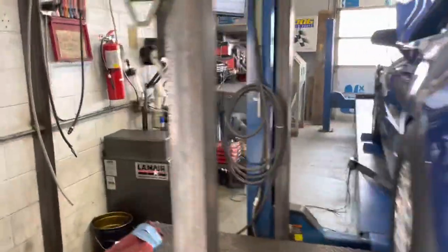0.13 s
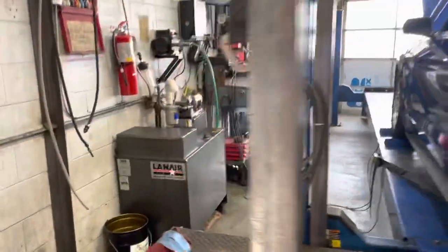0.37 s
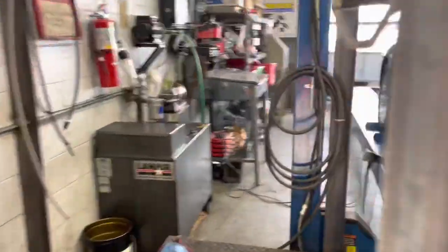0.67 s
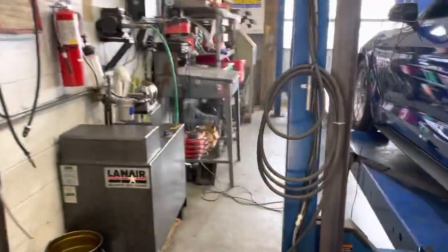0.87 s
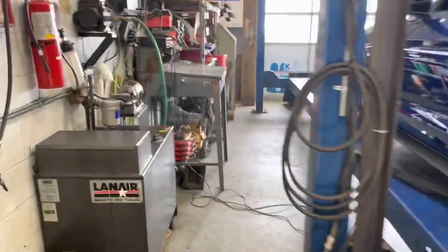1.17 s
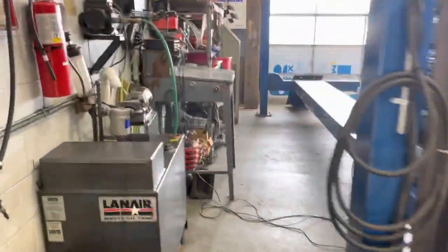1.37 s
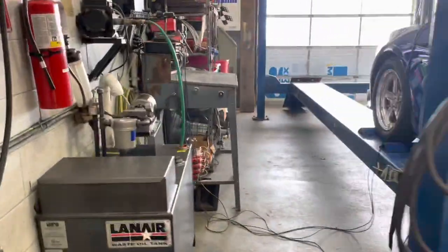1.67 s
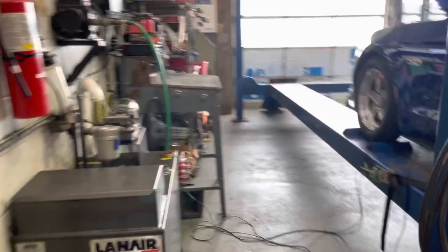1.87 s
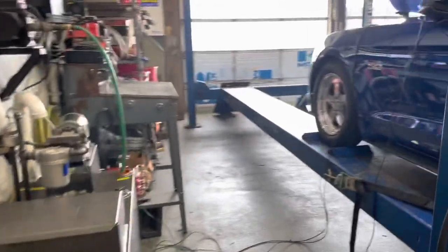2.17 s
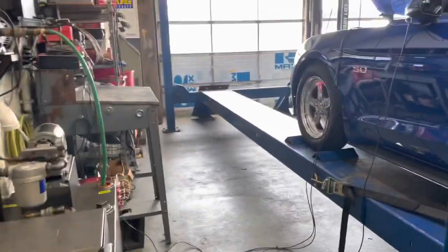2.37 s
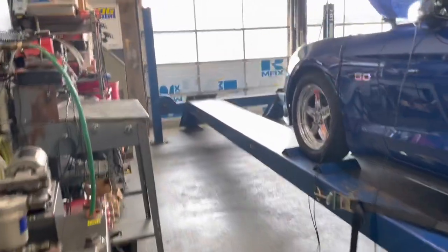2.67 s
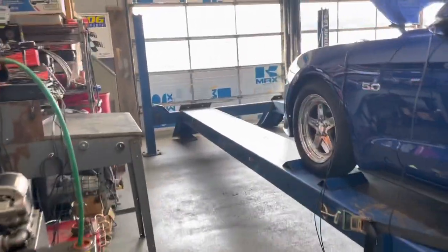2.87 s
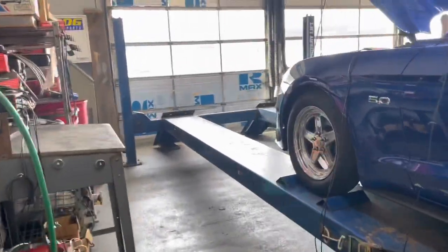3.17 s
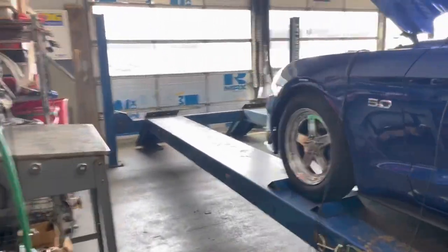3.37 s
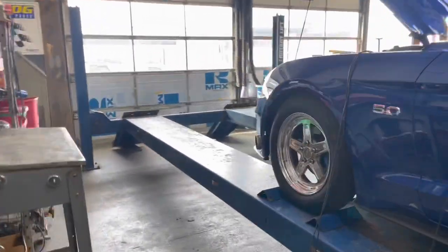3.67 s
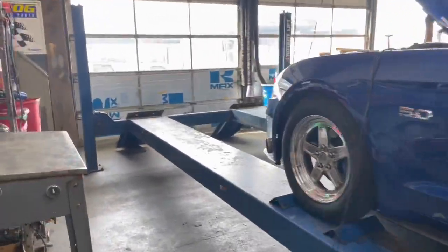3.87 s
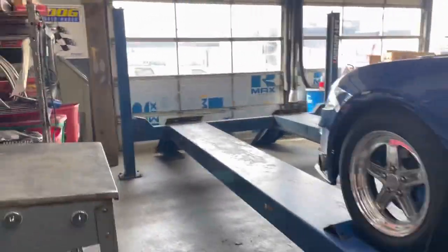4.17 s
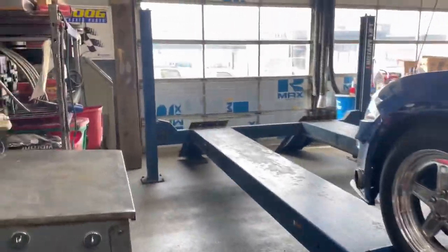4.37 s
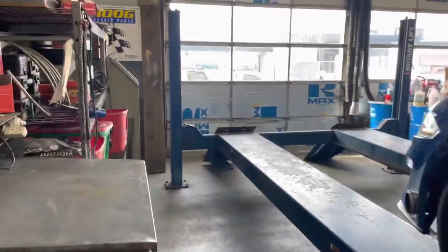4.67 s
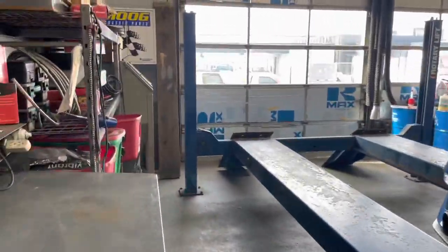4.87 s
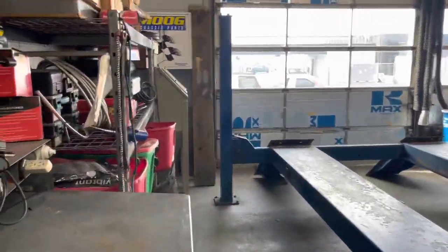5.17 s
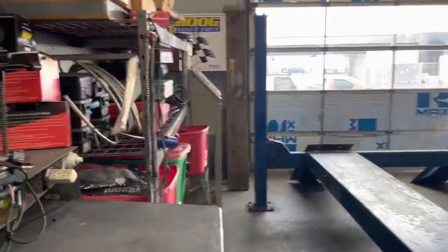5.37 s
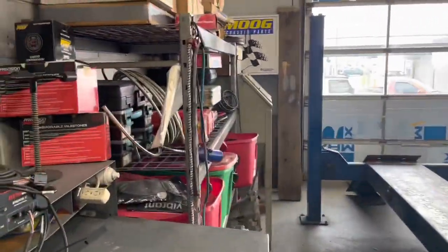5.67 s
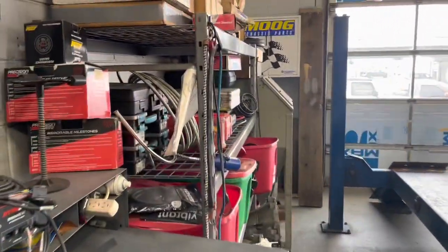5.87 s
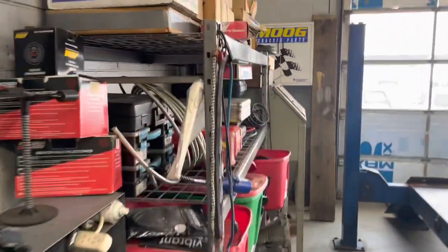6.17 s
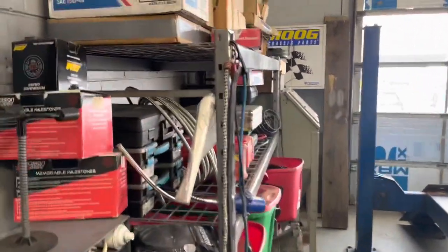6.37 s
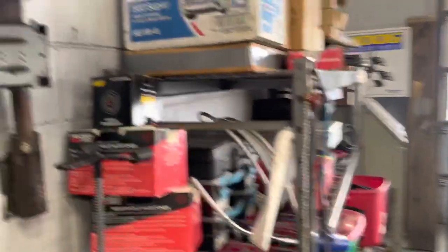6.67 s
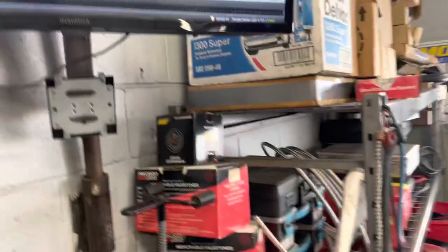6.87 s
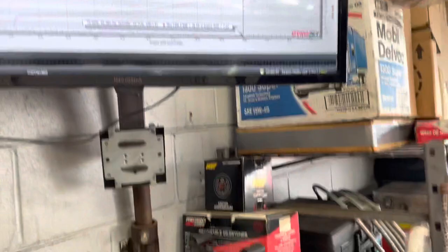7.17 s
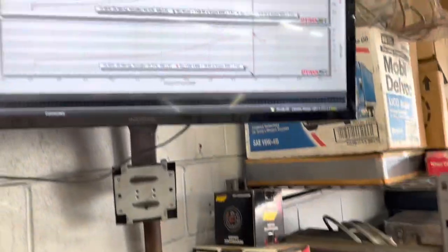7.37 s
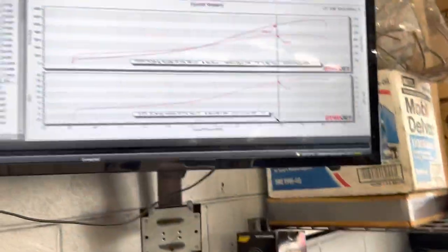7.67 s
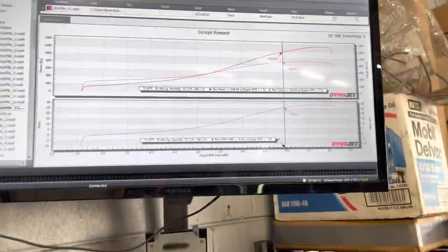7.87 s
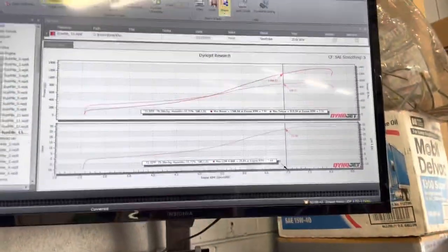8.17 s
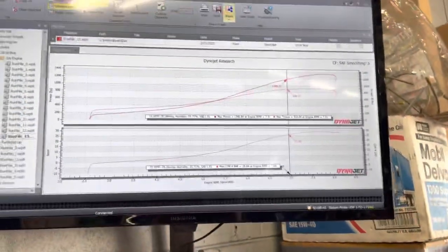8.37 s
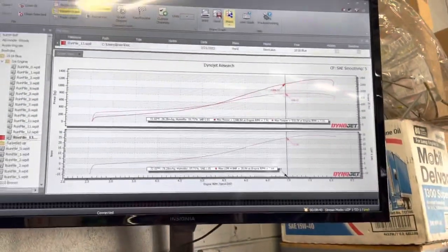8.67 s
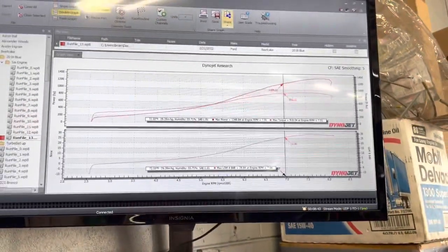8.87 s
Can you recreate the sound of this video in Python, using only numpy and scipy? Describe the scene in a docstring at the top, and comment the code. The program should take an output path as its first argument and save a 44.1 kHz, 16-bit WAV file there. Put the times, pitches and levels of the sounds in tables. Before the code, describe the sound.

Lumpy V8 idle in a hard-walled garage: revs fall with a whistling hiss, the exhaust boom grows, then one brief rev pickup.

```python
"""First the ear gets a big cross-plane V8 on a lift in a workshop: it settles to idle with a hiss of air as
the revs fall, and later picks up once briefly. Uneven bank firings sum to crank orders, with pulsed noise on top.
The microphone walks from beside the car towards its tail, so the exhaust grows louder and changes its boom,
while single orders swell and dip. Behind it two cooling fans whine as drifting tones, a loose panel sings,
and short noise bursts make the hand's rustle on the microphone's case and a few light knocks."""
import sys
import numpy as np
from scipy import signal
from scipy.fft import rfft, irfft, next_fast_len
from scipy.io import wavfile
from scipy.ndimage import uniform_filter1d, minimum_filter1d

SR = 44100
rng = np.random.default_rng(int(sys.argv[2]) if len(sys.argv) > 2 else 0)


def master_out(mix):
    """Clip the mix to full scale and print it as 16-bit PCM to the path in sys.argv[1]."""
    frames = np.transpose(np.atleast_2d(mix))
    ceiling = np.clip(frames, -1, 1)
    pcm = np.round(ceiling * 32767).astype(np.int16)
    wavfile.write(sys.argv[1], SR, pcm)


N = 398223
TIME = np.arange(N) / SR
IDLE_CYCLE_HZ = 7.35   # engine cycles per second, eight firings each

# order above which pipes and room markedly shift the phases
PIPE_ORDER = 27


def exhaust_note(cycle, cycle_hz, near_tail, revs, waver_db=1.2, spread=0.32, echo=0.227, scatter=0.18):
    """Each bank fires unevenly into its own pipe, so the multiples of the cycle rate sound: the burble."""
    out = np.zeros((2, N))
    for k, db in order_levels(near_tail, revs):
        height = k / PIPE_ORDER
        # away from idle, each order rises and sinks with the muffler's resonances
        db = db + muffler(k * cycle_hz) - muffler(k * IDLE_CYCLE_HZ)
        # reflections shift the higher orders more
        reflected = echo * rng.normal() + scatter * drift(0.46)
        shift = firing_phase(k) + height ** 4 * reflected
        phase = 2 * np.pi * k * (cycle % 1) + shift
        # opposite phase offsets widen the stereo image
        apart = spread * np.minimum(height, 1) * (near_tail + 0.59 * rng.normal())
        size = np.sqrt(2) * from_db(db + waver_db * height * drift(2.6))
        out += size * np.cos(np.array([phase - apart, phase + apart], np.float32))
    return out


# exhaust faders along the walk: [t/s, burble level/dB, growl level/dB]
EXHAUST_LEVELS = [(0, -33.5, -39.5), (0.7, -33.5, -39.5), (2.2, -29.5, -41.5), (3.3, -28.5, -32),
                  (4.4, -26, -32), (4.9, -23, -30), (5.4, -20, -33), (6, -18.5, -33), (6.6, -19, -30),
                  (7.3, -20.5, -32), (8.15, -24, -33.5), (9.03, -19.5, -31.5)]
# low orders that boom and burble, relative to the burble fader:
# [order, level beside the car/dB, level near the tail/dB, lift/dB per firing/s above idle]
BURBLE_ORDERS = [(5, -17.5, -19.0, 1.4), (6, -33.0, -27.0, 0.3), (7, -18.0, -19.5, -0.0),
                 (8, -6.0, -7.0, -1.0), (9, -13.5, -31.0, -0.2), (10, -17.5, -25.5, -0.1),
                 (11, -3.5, -16.0, -0.8), (12, -28.5, -29.5, -0.1), (13, -14.5, -18.5, 0.8),
                 (14, -20.0, -23.0, 1.7), (15, -21.0, -19.5, 0.6), (16, -1.5, -7.0, 0.9),
                 (17, -30.5, -12.0, 1.0), (18, -24.5, -10.0, 0.4), (19, -6.5, 0.5, -0.3),
                 (20, -12.0, -19.5, 0.7), (21, -4.0, -6.0, 0.7), (22, -17.0, -13.5, -0.5),
                 (23, -18.5, -14.0, 0.4), (24, -11.5, -2.5, -0.4), (25, -17.5, -11.5, 0.8),
                 (26, -18.0, -20.5, -1.0), (27, -6.0, -4.5, -1.4), (28, -18.5, -12.0, -0.9),
                 (29, -13.5, -21.0, -0.4), (30, -12.5, -14.0, -0.6), (31, -22.0, -16.5, -1.0),
                 (32, -8.5, -9.5, 0.2), (33, -8.5, -18.5, -0.1), (34, -19.0, -13.5, -0.3),
                 (35, -20.0, -14.5, 0.4), (36, -23.5, -27.0, -1.1)]
# throaty upper orders, relative to the growl fader: [order, level beside the car/dB, level near the tail/dB]
GROWL_ORDERS = [(37, -15, -10), (38, -16, -10), (39, -15, -15), (40, -13, -13), (42, -19, -17),
                (43, -19, -18), (44, -14, -15), (45, -9, -13.5), (46, -22, -22), (47, -18, -18),
                (48, -13, -17), (49, -14, -22), (50, -19, -22), (51, -18, -22), (52, -13, -19),
                (53, -20, -18), (54, -16, -15), (55, -22, -21), (56, -20, -27), (63, -22, -24.5),
                (65, -20, -21)]
# swells and dips of single orders over time: [order, t/s, half-width/s, level/dB]
ORDER_SWELLS = [(8, 0.2, 0.6, 19.0), (11, 3.3, 0.6, -9.5), (15, 1.4, 1, 13.5), (16, 1.6, 0.6, 9.0),
                (17, 1.1, 1, 18.5), (18, 1.5, 1, 21.0), (19, 3.5, 0.6, 6.5), (19, 0.3, 0.2, 9.0),
                (20, 0.6, 1, -20.0), (21, 4.1, 0.35, -19.5), (21, 0.5, 0.6, -14.5), (24, 5.7, 0.6, -17.0),
                (24, 3.4, 0.6, 6.5), (25, 8.5, 1, -20.5), (25, 1.5, 0.2, -26.0), (25, 0.2, 0.35, -18.0),
                (27, 3.6, 0.35, -17.0), (27, 4.9, 0.6, 6.5), (29, 2.4, 1, -24.5), (29, 0.8, 0.2, -19.5),
                (31, 5.1, 0.35, -25.5), (32, 0.2, 0.35, -21.5), (33, 2.9, 1, -27.5), (33, 0.2, 0.6, -22.0),
                (34, 1.9, 1, 9.5), (35, 5.4, 1, -9.0), (35, 3.7, 0.35, -15.0), (36, 2.7, 1, -25.0),
                (48, 1.69, 0.43, 9), (45, 5, 0.58, 4), (16, .68, .09, -11), (32, 1.1, .25, 5),
                (8, 6.5, .2, -6), (8, 7.05, .12, -12), (16, 7, .15, 5), (8, 5.8, .5, -2.5),
                (55, 7.75, .25, 10), (55, 8.6, .25, 9), (65, 3, .7, 2), (63, 2.6, .6, 3),
                (16, 2.3, .17, 4.5), (16, 4.6, .4, -3.5), (19, 6.45, .3, 2.5), (19, 3.75, .25, 2),
                (8, 3.3, .7, -2), (11, 4.7, .5, 4), (10, 7.1, .5, 5), (45, 4, .5, 4), (48, 4.9, .7, 4),
                (53, 8.3, .9, 4), (37, 6.75, .4, 6), (11, 8.2, .4, -6), (21, 8.1, .6, -3), (32, 8.8, .4, 3),
                (17, 5.4, .7, -5), (20, 6.9, .5, 5)]


def order_levels(near_tail, revs):
    """Each order (a multiple of the cycle rate) with its dB over time: fader, place, revs, swells and dips."""
    burble_db, growl_db = in_time(EXHAUST_LEVELS)
    levels = []
    for table, level_db in (BURBLE_ORDERS, burble_db), (GROWL_ORDERS, growl_db):
        for k, *law in table:
            swells_db = sum(swell(*row) for order, *row in ORDER_SWELLS if round(order) == round(k))
            levels.append((round(k), level_db + along_walk(near_tail, revs, *law) + swells_db))
    return levels


# muffler resonances and upper edge, which the orders slide through as the revs change: [f/Hz, level/dB]
MUFFLER = [(222, 0.5), (245, 7), (268, -1.5), (296, 7), (322, 2.5), (350, 0.5), (366, -3), (390, 5),
           (408, -2.5), (432, -22), (560, -32)]


def muffler(hz):
    """Gain of the muffler's resonances in dB."""
    return np.interp(hz, *np.transpose(MUFFLER))


# firing order by cylinder bank: [+1 one bank, -1 the other]
BANK = np.array([1, -1, 1, 1, -1, 1, -1, -1])
# how the two banks are heard along the walk: [from t/s, start of the lope in the cycle/ms, far bank lag/ms,
# far bank gain, first echo/ms, first echo gain, second echo/ms, second echo gain]
PLACES = [(0, 88.2, 11.6, 1, 14.6, .9, 40.3, -.7), (.75, 99.9, -10.5, .9, 15.9, -.7, 50.2, .6),
          (2.35, 17, -11.2, 1, 30.7, -.7, 59, .3), (3.1, 73.3, 18.8, .6, 9.9, -.6, 55.2, -.9),
          (4.4, 2.1, 8.9, 1, 31.3, .7, 33.8, -.7), (5.25, 119, -20.4, .6, 26.2, .3, 39.5, -.8),
          (6.35, 58.5, -8.7, .9, 22.8, .7, 40.4, .7), (7.45, 57.4, 10.6, 1, 19.6, .6, 62.1, .4)]
PLACE_BLEND_S = 0.4


def arrival(k):
    """One order at each place: two banks and two wall echoes interfere, which moves the accents of the lope."""
    def delayed(ms):
        return np.exp(-2j * np.pi * k * IDLE_CYCLE_HZ * ms / 1000)
    firings = np.exp(-2j * np.pi * k * np.arange(len(BANK)) / len(BANK))
    _, start, lag, far, first, first_gain, second, second_gain = np.transpose(PLACES)
    near_bank = firings[BANK > 0].sum()
    far_bank = far * delayed(lag) * firings[BANK < 0].sum()
    echoes = first_gain * delayed(first) + second_gain * delayed(second)
    return (near_bank + far_bank) * delayed(start) * (1 + echoes)


def firing_phase(k):
    """Phase of one order against the steady drone at the firing rate, blended from place to place."""
    phase = np.unwrap(np.angle(arrival(k) / arrival(len(BANK))))
    # each place holds its phase between two blends
    edges = [-PLACE_BLEND_S / 2, PLACE_BLEND_S / 2]
    s = np.add.outer(np.array(PLACES)[:, 0], edges).ravel()[1:]
    return np.interp(TIME, s, np.repeat(phase, 2)[:-1])


# EQ of the combustion thumps: [f/Hz, mid level/dB, side level/dB]
PIPE_COLOUR = [(20, -38, -56), (36, -14, -32), (54, -9, -35), (95, 0, -24), (131, -3.5, 9.5),
               (184, 3.5, 8.5), (232, 1, -7.5), (272, -5, -20), (319, -14.5, 1.5), (385, -11.5, -12),
               (462, -29, -29), (700, -45, -41)]


def uneven_combustion(cycle):
    """No two firings are equally strong; the differences thump through the pipes into the room."""
    burble_db, _ = in_time(EXHAUST_LEVELS)
    at = np.flatnonzero(np.diff(np.floor(cycle * len(BANK))))
    jitter = (rng.normal(0, 0.0018, len(at)) * SR).astype(int)   # spread 1.8 ms
    kicks = np.zeros(N)
    kicks[np.clip(at + jitter, 0, N - 1)] = rng.standard_normal(len(at))
    share = from_db(burble_db - 10.5)
    return share * coloured(workshop(kicks, t60=0.31, wet_db=1.5), PIPE_COLOUR)


# EQ of the rasp: [f/Hz, mid level/dB, side level/dB]
RASP_COLOUR = [(189, -3, -21), (270, 2, -10.5), (330, 2, -7.5), (386, -4, -7), (454, -16.5, -18.5),
               (540, -30, -28)]


def rasp(cycle, share_db=-7.5):
    """Every firing modulates turbulent flow through the muffler, which roughens the growl."""
    _, growl_db = in_time(EXHAUST_LEVELS)
    return from_db(growl_db + share_db) * noise(RASP_COLOUR, puffs(cycle, depth=1.5, uneven=0.79))


def puffs(cycle, depth, uneven):
    """Flow pulses at each firing, stronger for bank +1; above uneven 1 the other bank's pulses turn to dips."""
    firing = cycle * len(BANK)
    strength = 1 + uneven * BANK[firing.astype(int) % len(BANK)]
    return 1 + depth * strength * np.sin(np.pi * firing) ** 4


# gas rush and clatter fader at idle: [t/s, level/dB]
RUSH_LEVEL = [(0, -51), (0.7, -53.5), (1.3, -51.5), (3.1, -46.5), (4.9, -41), (6.8, -39.5), (9.03, -38)]
RUSH_REV_DB = 0.2735   # dB per firing/s above idle
# EQ shared by rush and clatter: [f/Hz, mid level/dB, side level/dB]
RUSH_COLOUR = [(207, -7.5, -19), (422, 3.5, 0.5), (580, 5.5, 10.5), (740, 3, 1), (1046, -0.5, 1.5),
               (1500, -4, -1.5), (2120, -7, -9), (2920, -11, -13.5), (4660, -14, -18), (8000, -73, -55)]


def rush_and_clatter(cycle, revs, rush_share_db=-1.5):
    """Turbulence at the pipe mouths pulses with the firings, under the clatter of the valve train."""
    level_db = in_time(RUSH_LEVEL)[0] + RUSH_REV_DB * revs
    rush = noise(RUSH_COLOUR, puffs(cycle, depth=0.23, uneven=1.0))
    return from_db(level_db) * (from_db(rush_share_db) * rush + clatter(cycle))


# ringing panels: [f/Hz, width/Hz, lift/dB]
PANEL_MODES = [(790, 40, 2.5), (900, 50, 2), (1050, 90, 2), (1130, 50, 1.5), (1350, 60, 3), (1679, 20, 4.5),
               (2030, 50, 1.5), (2250, 40, 2), (2840, 60, 1.5)]


def clatter(cycle, count=16, pattern_db=1.5, chance_db=1.6):
    """Valves close twice per firing, each with its own strength, and set the panels ringing."""
    at = np.flatnonzero(np.diff(np.floor(cycle * count)))
    valve_db = pattern_db * rng.standard_normal(count)
    strength_db = valve_db[np.arange(len(at)) % count] + chance_db * rng.standard_normal(len(at))
    taps = np.zeros(N)
    taps[at] = from_db(strength_db)
    # each tap is a rattle of a few milliseconds
    envelope = signal.lfilter([1], [1, -np.exp(-1 / (0.0026 * SR))], taps + 1e-18)
    rattle = envelope * rng.standard_normal(N)
    return coloured(workshop(rattle, t60=0.12, wet_db=6.5), RUSH_COLOUR, PANEL_MODES)


# EQ of the hiss: [f/Hz, mid level/dB, side level/dB]
HISS_COLOUR = [(1500, -13, -40), (2500, -7.5, -22), (2900, -9.5, -17), (3280, -6, -7.5), (3780, -2.5, -3),
               (4600, -0.5, -5.5), (4750, -1.5, -1.5), (5180, 4.5, -12.5), (5280, -2, 2), (5550, -2, -1.5),
               (6870, 1, -3.5), (8090, -11, 2), (8700, -53, -35), (10900, -8.5, -5), (13000, -48, -51)]
# EQ of the airy top, the spray: [f/Hz, mid level/dB, side level/dB]
SPRAY_COLOUR = [(5000, -22, -19), (8900, -28, 8.5), (9820, -2.5, 2), (11440, 0.5, 1), (12800, 1, -20),
                (13800, 0, -31), (15500, -10, -33)]
# whistling resonances in the air: [f/Hz, width/Hz, lift/dB]
WHISTLES = [(4455, 39, 6.5), (4835, 52, 9), (5360, 73, 7), (5900, 56, 5.5), (6320, 38, 6), (7200, 34, 4.5),
            (12400, 90, -1), (12400, 90, 5.5), (12900, 100, 0.5)]
# the sizzle is louder for a stretch of the walk and as the revs pick up: [t/s, half-width/s, level/dB]
SIZZLE_SWELLS = [(5.6, 0.65, 2.5), (6.82, 0.28, 3)]
# brief gusts of air while the revs fall: [t/s, half-width/s, level/dB]
SURGES = [(0.77, 0.057, 2), (0.99, 0.027, 1)]
SHUT_S, SHUT_ATTACK_S, SHUT_HOLD_S = 0.29, 0.049, 0.61   # the throttle shuts: start, attack, hold
HISS_DB, HISS_FALL_DB_PER_S, SPRAY_DB, SPRAY_FALL_DB_PER_S = -38.5, 11, -36.5, 15.5
# steady intake sizzle: (dB beside the car, dB near the tail, dB per firing/s above idle)
HISS_IDLE, SPRAY_IDLE = (-52, -54.5, 0.33), (-62.5, -57, .3)
OPEN_THROTTLE_DB = -11.5   # offset of the sizzle's hiss before the throttle shuts
HISS_LEFT_DB = 1.93   # left up and right down by this much


def throttle_air(cycle, near_tail, revs, flutter_db=0.94):
    """Air squeezes past the closing throttle: a sudden bright, whistling hiss that sinks to a steady sizzle."""
    shut = np.clip((TIME - SHUT_S) / SHUT_ATTACK_S, 0, 1)
    fading = np.maximum(TIME - SHUT_S - SHUT_HOLD_S, 0)
    sizzle_db = along_walk(near_tail, revs, *HISS_IDLE) + sum(swell(*row) for row in SIZZLE_SWELLS)
    sizzle_db = sizzle_db + OPEN_THROTTLE_DB * (1 - shut)
    hiss = np.hypot(shut * from_db(HISS_DB - HISS_FALL_DB_PER_S * fading), from_db(sizzle_db))
    steady_spray = from_db(along_walk(near_tail, revs, *SPRAY_IDLE))
    spray = np.hypot(shut * from_db(SPRAY_DB - SPRAY_FALL_DB_PER_S * fading), steady_spray)
    gusts_db = flutter_db * drift(10.0) + sum(swell(*surge) for surge in SURGES)
    suck = puffs(cycle, depth=0.088, uneven=1.6) * from_db(gusts_db)
    lean = from_db([[HISS_LEFT_DB], [-HISS_LEFT_DB]])
    bright = lean * hiss * noise(HISS_COLOUR, suck, WHISTLES)
    return bright + spray * noise(SPRAY_COLOUR, suck, WHISTLES)


# rustle of the hand on the case: [t/s, level before the attack/dB, decay/s]
RUSTLE = [(4.681, -48, .012), (5.085, -53, 0.041), (5.308, -37, 0.004), (5.445, -53, 0.081),
          (5.578, -34.5, 0.0024), (5.615, -50, .025), (5.75, -51, .02), (5.885, -50, 0.03),
          (5.937, -40, .003), (5.988, -44, 0.0088), (6.435, -54, 0.052)]
# EQ of the rustle: [f/Hz, mid level/dB, side level/dB]
RUSTLE_COLOUR = [(6000, -43, -18), (8700, -28, -5), (10270, 13, 19), (13000, 10, -6), (16000, -25, -35)]
# light knocks: [t/s, level before the attack/dB, f/Hz, decay/s]
KNOCKS = [(6.745, -27.5, 1220, .006), (6.806, -36, 1550, .006), (6.858, -39, 4300, .013),
          (8.133, -36, 950, .005), (8.68, -37, 1900, .009), (8.729, -28, 900, .005),
          (9.008, -33, 1000, .007)]


def handling(grain_db=3.5):
    """Fingers rustle grainily on the case and loose parts knock lightly."""
    grain = from_db(grain_db * np.clip(drift(150), -2, 2))
    out = sum(burst(*row) for row in RUSTLE) * noise(RUSTLE_COLOUR, grain)
    for s, db, hz, decay in KNOCKS:
        knock_colour = [(hz * .55, -16, -18), (hz, 0, -3), (hz * 1.5, -18, -20)]
        out += burst(s, db, decay) * noise(knock_colour)
    return out


def burst(s, db, decay):
    """Envelope of one short contact: a half-millisecond attack and an exponential decay."""
    age = np.maximum(TIME - s, 0)
    return from_db(db) * (1 - np.exp(-age / 0.00048)) * np.exp(-np.minimum(age / decay, 40))


# a loose panel sings briefly: [t/s, half-width/s, level/dB]
BUZZES = [(5.0, .04, -51), (5.28, .05, -50), (7.05, .25, -49)]
BUZZ_HZ = 1030


def buzz():
    """A loose panel rings in one narrow resonance, made of band-limited noise."""
    level = sum(from_db(db) * swell(s, width, 1) for s, width, db in BUZZES)
    return level * noise([(BUZZ_HZ - 60, -25, -25), (BUZZ_HZ, 0, 0), (BUZZ_HZ + 60, -25, -25)])


HUM_HZ = 560
# pitch of the whining fan: [t/s, f/Hz]
WHINE_PITCH = [(0, 607), (2, 606.5), (5, 604), (9.03, 603)]
# overtones of the hum: [multiple of the blade rate, level/dB]
HUM_PARTIALS = [(3, -11.5), (4, -18.5)]
# overtones of the whine: [multiple of the blade rate, level/dB]
WHINE_PARTIALS = [(2, -3), (3, -10.5), (4, -11.5)]
# swells and dips of the hum over time: [t/s, half-width/s, level/dB]
HUM_SWELLS = [(4.15, 0.3, 12.5), (5.15, 0.3, 12), (5.6, .3, 9.5), (6.1, 0.35, 13), (8.1, 1.1, -5)]
# swells and dips of the whine over time: [t/s, half-width/s, level/dB]
WHINE_SWELLS = [(1.3, 0.35, 6), (3.95, 0.55, 13), (5.1, 0.4, 9), (6.1, 0.6, 11), (8.2, .9, -3)]
# fan faders: (dB beside the car, dB near the tail)
HUM_LEVEL, WHINE_LEVEL, OVERTONE_LEVEL = (-55.5, -54.5), (-55.5, -50.5), (-56, -47.5)


def fans(near_tail):
    """Two cooling fans, a hum and a slightly higher whine, swell and dip; their overtones stay more even."""
    whine_hz, = in_time(WHINE_PITCH)
    hum_db = along_walk(near_tail, 0, *HUM_LEVEL) + sum(swell(*row) for row in HUM_SWELLS)
    whine_db = along_walk(near_tail, 0, *WHINE_LEVEL) + sum(swell(*row) for row in WHINE_SWELLS)
    overtone_db = along_walk(near_tail, 0, *OVERTONE_LEVEL)
    overtones = fan(whine_hz, WHINE_PARTIALS, overtone_db) + fan(HUM_HZ, HUM_PARTIALS, overtone_db)
    return fan(HUM_HZ, [(1, 0.0064)], hum_db) + fan(whine_hz, [(1, 0)], whine_db) + overtones


FAN_REFLECTED = 0.35   # strength of the reflections against the direct tone


def fan(hz, partials, level_db, wander=0.00186):
    """Blade tones; their reflections reach each channel with slowly changing strength and phase."""
    turn = 2 * np.pi * np.cumsum(hz * (1 + wander * drift(1.85))) / SR
    out = np.zeros((2, N))
    for k, db in partials:
        c, s = np.cos(round(k) * turn), np.sin(round(k) * turn)
        mid, side = [direct + FAN_REFLECTED * (drift(1.0) * c + drift(1.0) * s) for direct in (c, s)]
        out += from_db(db) * np.array([mid + side, mid - side])
    return from_db(level_db) * out


def workshop(x, t60, wet_db, count=4):
    """Mid and side of a source: direct sound in the centre plus dense, slowly changing reflections."""
    age = np.arange(SR // 2) / SR
    tails = rng.standard_normal((count, 2, len(age))) * from_db(-60 * age / t60)
    tails /= np.sqrt(np.sum(tails ** 2, axis=2, keepdims=True))
    nearness = np.array([drift(0.38) for _ in tails])
    nearness /= np.sqrt(np.sum(nearness ** 2, axis=0))
    reflections = sum(near * signal.oaconvolve(x[None], tail, axes=1)[:, :N]
                      for near, tail in zip(nearness, tails))
    mid, side = from_db(wet_db) * reflections
    return np.array([rms_one(mid + x), rms_one(side)])


def noise(colour, gate=1, peaks=()):
    """Stereo noise of one colour, optionally modulated before the filter."""
    return coloured(rng.standard_normal((2, N)) * gate, colour, peaks)


def coloured(pair, colour, peaks=()):
    """Shape a mid and a side signal by EQ and resonances; left and right, scaled to a mid of rms 1."""
    hz, *levels = np.transpose(colour)
    size = next_fast_len(N + SR // 4)
    bins = np.arange(size // 2 + 1) * SR / size + 1
    # the EQ falls steeply beyond its end points
    outside = np.maximum(np.log(hz[0] / bins), 0) + np.maximum(np.log(bins / hz[-1]), 0)
    ringing = 1 + sum((from_db(lift) - 1) / (1 + 2j * (bins - centre) / width)
                      for centre, width, lift in peaks)
    shaped = []
    for x, db in zip(pair, levels):
        eq = from_db(np.interp(np.log(bins), np.log(hz), db) - 93 * outside)
        shaped.append(irfft(rfft(x, size) * ringing * eq, size)[:N])
    mid, side = shaped
    return np.array([mid + side, mid - side]) / np.std(mid)


def along_walk(near_tail, revs, beside_db, tail_db, rev_db=0):
    """A level that shifts with the place of the microphone and with the revs above idle."""
    return beside_db + near_tail * (tail_db - beside_db) + rev_db * revs


def swell(s, width, db):
    """A smooth rise or dip around one moment."""
    return db * np.exp(-((TIME - s) / width) ** 2)


def drift(rate):
    """Low-passed chance of spread 1; rate is the corner of each of two poles in Hz."""
    r = np.exp(-200 * np.pi * rate / SR)   # computed at every hundredth sample
    slow = signal.lfilter([1], [1, -2 * r, r * r], rng.standard_normal(N // 100 + 1002))[1000:]
    return np.interp(np.arange(N) / 100, np.arange(len(slow)), rms_one(slow))


def in_time(rows):
    """Each column of a curve table at every sample."""
    s, *columns = np.transpose(rows)
    return [np.interp(TIME, s, c) for c in columns]


def rms_one(x):
    """Scale to rms 1."""
    return x / np.sqrt(np.mean(x ** 2) + 1e-20)


def from_db(db):
    """Decibels to gain."""
    return 10 ** (np.asarray(db) / 20)


# engine speed: [t/s, firing rate/(firings/s)]
SPEED = [(0.0, 64.9), (0.25, 69.16), (0.6, 65.12), (1.0, 61.13), (1.75, 58.28), (2.05, 59.06), (3.0, 58.75),
         (3.35, 58.06), (4.4, 58.27), (4.8, 58.8), (6.2, 58.57), (6.5, 63.42), (6.8, 63.77), (7.0, 66.59),
         (7.25, 64.45), (7.6, 57.49), (7.95, 55.83), (9.03, 57.92)]
# the walk: [t/s, place from 0 beside the car to 1 near the tail]
WALK = [(0, 0), (3.9, 0.067), (5.0, 0.88), (9.03, 1)]
BOOM_RIGHT_DB, BOOM_RIGHT_TAIL_DB = 0.74, 2   # lean of the boom beside the car and near the tail


def scene():
    """One crankshaft drives every engine layer; near the tail the exhaust lies to the right."""
    cycle_hz = in_time(SPEED)[0] / len(BANK)
    revs = (cycle_hz - IDLE_CYCLE_HZ) * len(BANK)   # firings per s above idle
    near_tail, = in_time(WALK)
    cycle = np.cumsum(cycle_hz) / SR
    exhaust = exhaust_note(cycle, cycle_hz, near_tail, revs) + uneven_combustion(cycle) + rasp(cycle)
    # only the boom leans right; the longest waves and the growl reach both channels alike
    boom_band = signal.butter(2, [85, 250], "band", fs=SR, output="sos")
    boom = signal.sosfiltfilt(boom_band, exhaust)
    right_db = along_walk(near_tail, 0, BOOM_RIGHT_DB, BOOM_RIGHT_TAIL_DB)
    exhaust = exhaust + boom * (from_db([-right_db, right_db]) - 1)
    engine = exhaust + rush_and_clatter(cycle, revs) + throttle_air(cycle, near_tail, revs)
    return engine + handling() + buzz() + fans(near_tail)


CEILING, LIMITER_S, CUTOFF_HZ = 0.72, 0.04, 15700   # limiter peak, its window, top cut


def record(dry):
    """A limiter eases the level down around the tallest peaks, and the top is cut steeply."""
    size = int(LIMITER_S * SR)
    gain = CEILING / np.maximum(np.abs(dry).max(axis=0), CEILING)
    gain = uniform_filter1d(minimum_filter1d(gain, size), size)
    top_cut = signal.ellip(10, .1, 80, CUTOFF_HZ, fs=SR, output="sos")
    return signal.sosfilt(top_cut, dry * gain)


dry = scene()
out = record(dry)
master_out(out)
```